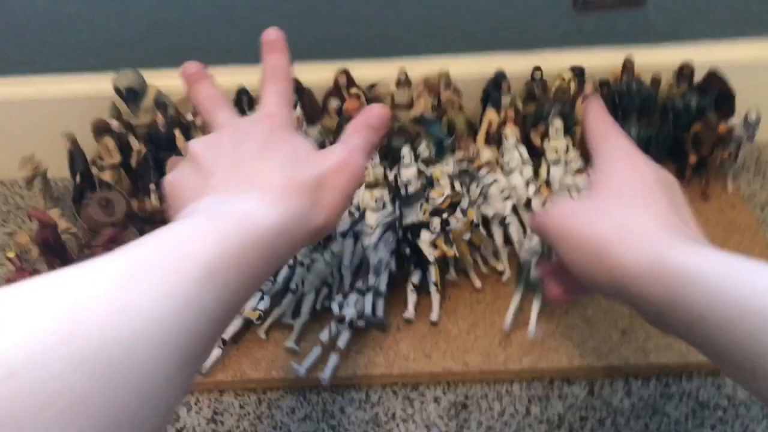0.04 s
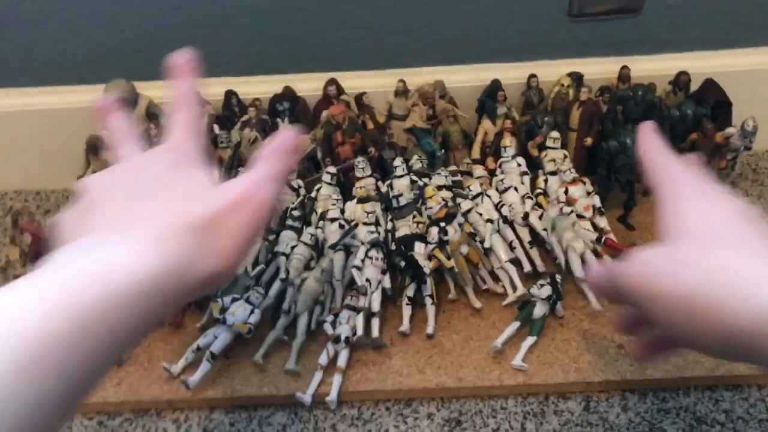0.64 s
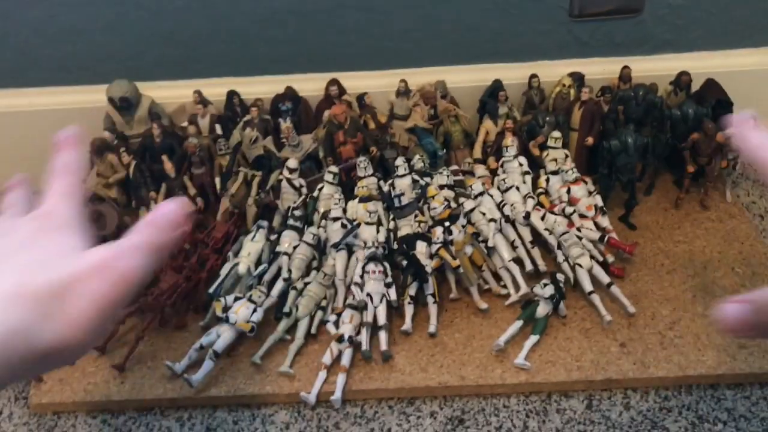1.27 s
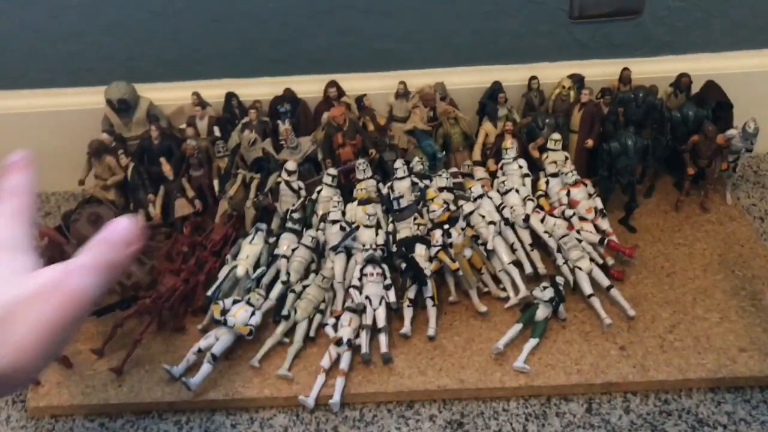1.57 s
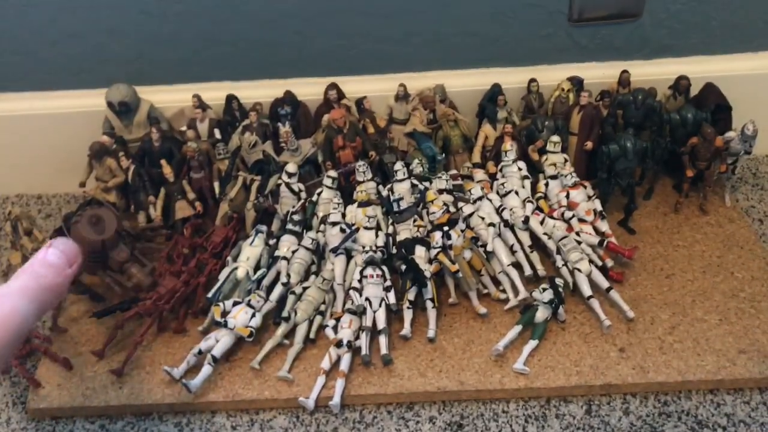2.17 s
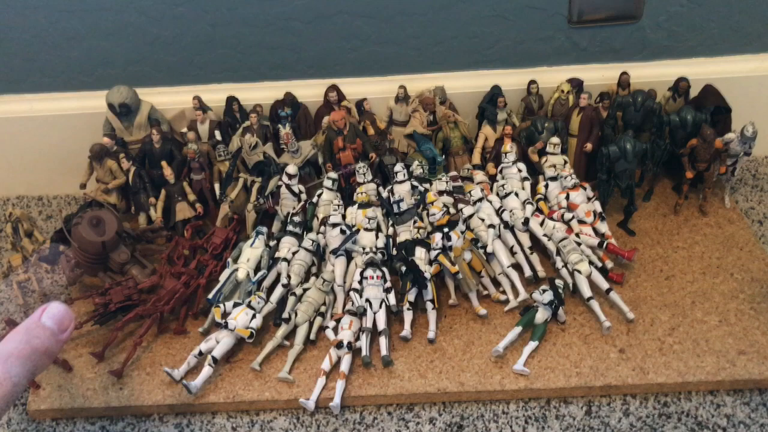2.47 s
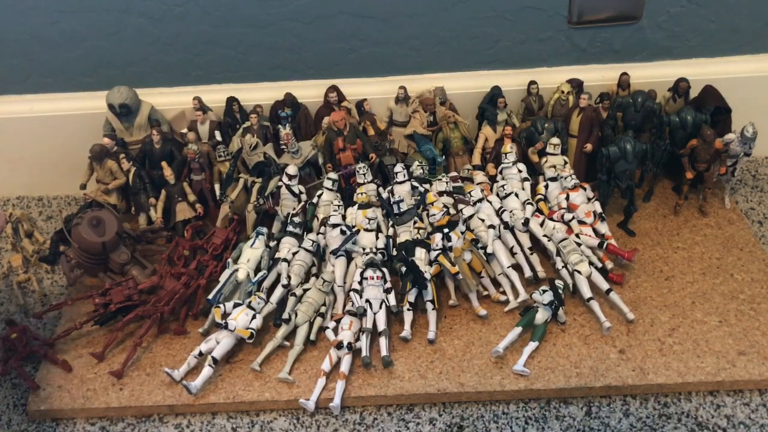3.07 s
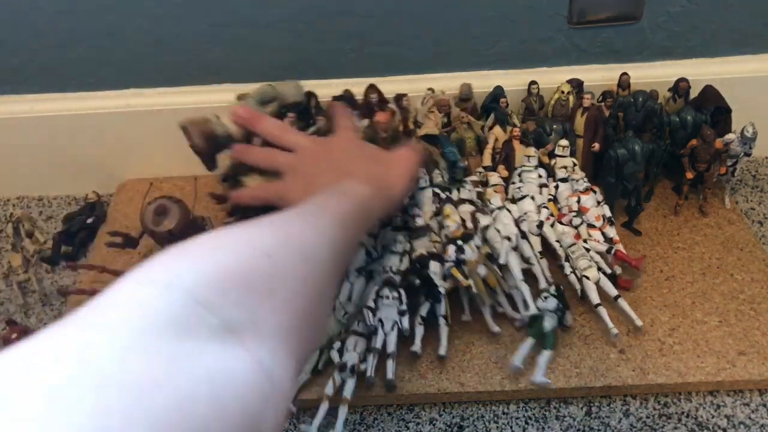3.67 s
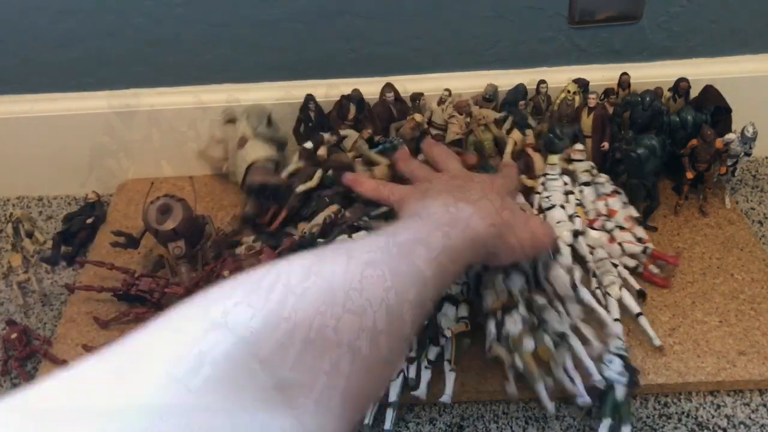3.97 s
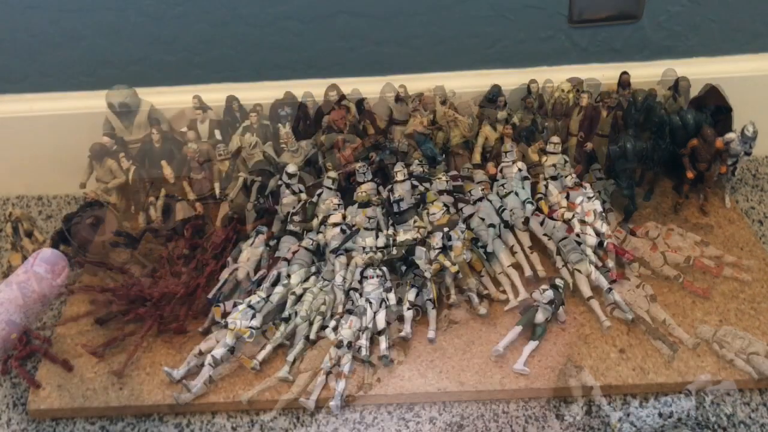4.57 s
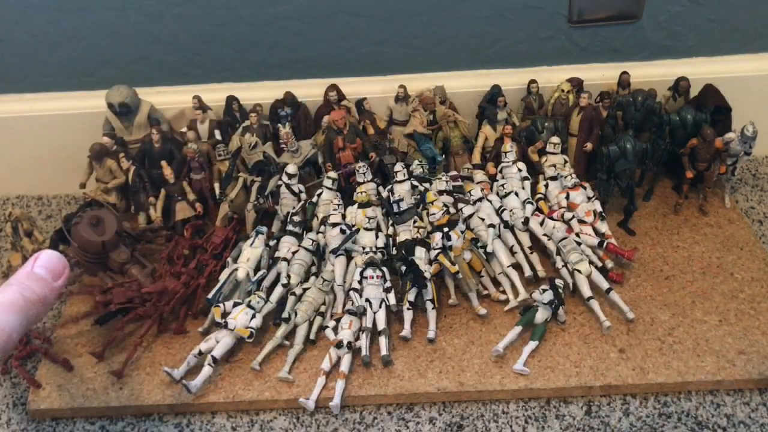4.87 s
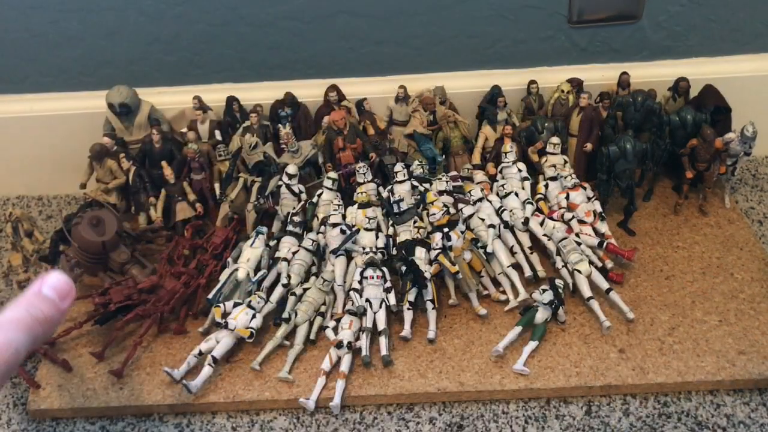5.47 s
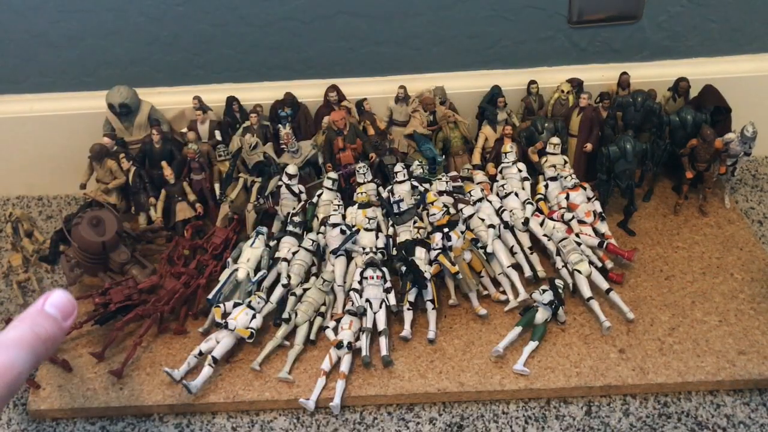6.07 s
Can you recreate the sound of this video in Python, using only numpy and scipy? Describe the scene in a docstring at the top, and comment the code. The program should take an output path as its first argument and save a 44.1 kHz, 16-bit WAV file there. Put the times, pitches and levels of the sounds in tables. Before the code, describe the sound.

Deep, slowed tumbling of plastic toys, a lull, then a rush of clicks and thuds on a board, ending in two soft knocks.

```python
"""A quiet room, where small plastic figures topple into one another on a cork board.
Each impact radiates a click and excites damped modes of limbs, hollow torsos and board; many impacts
merge into clatter. The end of a fall is heard in slow motion, which lowers its clicks to deep knocks.
At normal speed a hand sweeps the crowd over in one rush; then, slower still, a last figure settles
with two soft knocks. A short reverberation follows the impacts, over a low rumble and a faint hiss."""
import sys
import numpy as np
from scipy import signal
from scipy.fft import rfft, irfft
from scipy.io import wavfile
from scipy.ndimage import map_coordinates

SR = 44100
rng = np.random.default_rng(int(sys.argv[2]) if len(sys.argv) > 2 else 0)


def file_out(sig):
    """Save sig as 16-bit WAV at sys.argv[1]."""
    # one column per channel
    cols = np.atleast_2d(sig).T
    # limit, then scale
    lim = np.clip(cols, -1, 1)
    pcm = np.round(lim * 32767).astype(np.int16)
    wavfile.write(sys.argv[1], SR, pcm)


N = 278712

# Stages of motion: start t/s, speed/(normal speed).
# All tables give t as the listener hears it; frequencies and decay rates hold at normal speed.
SPEED_STAGES = [(0, .294), (2.15, 1), (4.8, .196)]
STAGE_STARTS, STAGE_SPEEDS = np.transpose(SPEED_STAGES)
HEARD_TIME = np.arange(N) / SR
SPEED = STAGE_SPEEDS[np.searchsorted(STAGE_STARTS, HEARD_TIME, side="right") - 1]
BOARD_TIME = np.cumsum(SPEED) / SR  # seconds elapsed on the board at each sample heard
BOARD_SAMPLES = int(BOARD_TIME[-1] * SR) + SR // 10
AGE = np.arange(int(.09 * SR)) / SR  # seconds since an impact
TOP_HZ = 15800


def knocks(graze_db=-12, edge_trim_db=-2.5, board_trim_db=-1.5):
    """Impact in stages: an edge grazes, the full blow lands, then torso and board respond."""
    # Prominent collisions: t/s, click level/dB, click f/Hz,
    # then edge, torso and board level/dB relative to the click, before the trims
    collisions = [(0.008, -32, 3320, 1, 10.5, 10.5), (0.034, -48, 2700, 3.5, 2, 15.5),
                  (0.091, -42.5, 2750, -7.5, 7, 16.5), (0.109, -41.5, 2670, -24, 1.5, 9),
                  (0.162, -29, 3420, -24.5, -17, -16), (0.173, -34, 3370, -24.5, -19.5, -9),
                  (0.214, -34.5, 2860, -21, 7.5, 1.5), (0.256, -44.5, 3050, -11.5, -0.5, 8.5),
                  (0.37, -51.5, 3510, -5.5, -2, 1), (0.434, -26.5, 3400, -12.5, 6, -30.5),
                  (0.439, -30.5, 3270, -19, -1.5, 4), (0.533, -47.5, 2580, -23, 10.5, 4),
                  (0.608, -22, 3010, -28.5, -18.5, -29), (0.6766, -59, 2980, 2.5, -3, 6.5),
                  (0.719, -45, 3280, -0.5, -16.5, -7.5), (0.759, -28.5, 4300, -27.5, -9, -0.5),
                  (0.794, -49, 2930, -7.5, -9.5, -11), (0.827, -37.5, 3300, -26, -1, -23),
                  (0.929, -42, 3630, -14.5, -3.5, -20.5), (0.984, -26.5, 3800, -29.5, -20, -41),
                  (1.039, -59.5, 3300, 0, -3, 10), (1.09, -50, 4430, -34, -2.5, -20),
                  (1.117, -37, 3440, -54, -26, -19), (1.329, -63.5, 3150, 1, 5, -10),
                  (2.282, -52, 3690, -23.5, -7, -21), (2.297, -46.5, 3260, -22, -13, -21),
                  (3.098, -62, 3300, -2, 9, 15), (3.393, -54, 4720, 6.5, 0, 14),
                  (3.416, -44, 4770, 7, -17.5, 10.5), (3.432, -35.5, 3550, -3, -1, 4.5),
                  (3.518, -42, 2970, -8, 5.5, 16.5), (3.581, -44.5, 3270, -5.5, 8, -0.5),
                  (3.613, -41.5, 3200, -10.5, 3, 20.5), (3.704, -31.5, 3300, -10, -5, -21),
                  (3.72, -39, 3900, -16.5, -6.5, 9), (3.881, -34, 3400, -11, -8, 8),
                  (3.904, -35, 3130, -16, -11, -27), (3.943, -34, 3460, -3.5, 4, 15),
                  (3.967, -50, 3320, -11, 16.5, 9.5), (4.024, -39.5, 3700, -4, -25, 9.5),
                  (4.046, -38, 3220, -11.5, 4, 13.5), (4.111, -43.5, 2730, -6, 9, 4),
                  (4.146, -42.5, 3440, -19, -5, -26), (4.243, -36.5, 4500, -5.5, -9, -6.5),
                  (4.271, -38, 3550, -11, -48, 2), (4.293, -41.5, 4570, -10, 4, -20),
                  (4.336, -44.5, 2960, -1.5, 8, 19.5), (4.38, -30.5, 3200, -12, -9.5, -19),
                  (4.468, -49, 2920, -16, 11.5, 7), (4.478, -43.5, 4350, -35, -25, 8),
                  (4.521, -50.5, 3260, -11, -4, 2), (4.582, -55.5, 3200, -8, 3.5, -8),
                  (4.722, -67.5, 3240, -0.5, 11, 16), (4.772, -60, 2840, -13, 1, 2.5),
                  (4.993, -45, 3020, -45, -5.5, -5), (5.079, -38.5, 3020, -25.5, -11, -22)]
    out = np.zeros(BOARD_SAMPLES)
    for s, db, hz, edge_db, torso_db, board_db in collisions:
        ring_db = 8.5 + .25 * edge_db  # the harder the edges meet, the more the limbs ring
        graze = undb(graze_db) * click(hz, ring_db) + undb(edge_db + edge_trim_db) * edge_tick()
        blow = click(hz, ring_db)
        response = undb(torso_db) * torso_knock() + undb(board_db + board_trim_db) * board_thump()
        add_impact(out, s, undb(db) * (graze + delay(blow, .0007) + delay(response, .001)))
    return out


def click(hz, ring_db, detune=.022, board_echo_s=.0015, wall_echo_s=.0028):
    """A contact pulse radiates, reflects off board and wall, rings the limbs and scatters off the crowd."""
    # Modes of stiff limbs and helmets: f/Hz, level/dB
    limb_modes = [(1950, 1), (2350, -2), (2600, -12.5), (2900, -5), (3700, -4), (3900, -7), (4650, -1),
                  (5000, -6), (5400, -3.5), (6200, -2), (7200, -12.5)]
    cycles = AGE * hz
    contact = unit(cycles ** 3 * np.exp(-cycles / .3) * np.sin(2 * np.pi * cycles))
    early = contact + undb(-8) * delay(contact, board_echo_s) + undb(-12) * delay(contact, wall_echo_s)
    # the force on the limbs starts more abruptly, so its spectrum is wider
    force = unit(cycles * np.exp(-cycles / .45) * np.sin(2 * np.pi * cycles))
    scatter = unit(noise_burst(t60=.026))
    limbs = modal_ring(limb_modes, t60=.021, detune=detune)
    ringing = signal.fftconvolve(force, limbs + scatter)[:len(AGE)]
    return unit(early + undb(ring_db) * unit(delay(ringing, board_echo_s / 2)))


def edge_tick(rise_s=.0004):
    """Hard edges make brief contact, so their snap lies high in the spectrum."""
    snap = noise_burst(t60=.012) * (1 - np.exp(-AGE / rise_s))
    return unit(band(snap, 6000, 15500))


def torso_knock(t60=.02, rattle_db=-3):
    """A hollow torso resonates, quickly damped by the soft plastic, while its loose joints rattle."""
    # Modes of a torso striking the board: f/Hz, level/dB
    torso_modes = [(540, -2), (690, -1.5), (840, 0.5), (985, 5.5), (1130, -8), (1450, -6.5), (1660, -4)]
    rattle = unit(band(noise_burst(t60), 320, 2200))
    hollow = modal_ring(torso_modes, t60, detune=.036)
    return unit(band(hollow + undb(rattle_db) * rattle, 480, 2100, order=3))


def board_thump():
    """The board yields under a falling figure and vibrates in low modes that the cork damps."""
    # Modes of the board: f/Hz, level/dB
    board_modes = [(88, -8), (120, -4.5), (175, -4), (235, 2.5), (295, 0.5), (375, -2)]
    return unit(band(modal_ring(board_modes, t60=.045, detune=.066), 78, 600))


def clatter(centre_hz=3200, pitch_spread=.34, count=16):
    """Dozens of figures jostle; their impacts add incoherently into a rush."""
    surge_db = flurries()
    # heavy landings come first and light jostling lasts, so the clicks sag the slowest
    click_db = toppling() + surge_db
    body_db = toppling(sag_ratio=1.8) + surge_db
    board_db = toppling(sag_ratio=3.13, on_board=True) + surge_db
    pitches = centre_hz * np.exp(pitch_spread * np.linspace(-2, 2, count))  # small parts click higher
    clicks = [click(hz, ring_db=-1.5, detune=.039) for hz in pitches]
    ticks = [edge_tick() for _ in range(count)]
    return (shower(clicks, click_db - 3, per_s=1000, spread_db=2.5)
            + shower(ticks, body_db - 15, per_s=850, spread_db=3.6)
            + shower([torso_knock() for _ in range(count)], body_db - 1.1, per_s=700, spread_db=2.0)
            + shower([board_thump() for _ in range(count)], board_db - 3.5, per_s=590, spread_db=1.5))


def toppling(sag_ratio=1, on_board=False):
    """Level in dB of the strongest wave of falling figures: abrupt onset, then exponential decay."""
    # Waves: start t/s, end t/s, level/dB, extra level on the board/dB, sag of the clicks/(dB/s)
    waves = [(0.0, 0.18, -39, 10.5, 27.5), (0.439, 0.967, -48.5, 10, 28), (3.402, 4.17, -41.5, 13, 5),
             (3.859, 4.064, -42, 6.5, 5.5), (4.23, 4.386, -44, 5, 5.5)]
    levels = [db + on_board * weight_db
              + envelope_db(start, end, attack_s=.0021, sag_db_per_s=sag_ratio * sag, fall_db_per_s=104.5)
              for start, end, db, weight_db, sag in waves]
    return np.max(levels, axis=0)


def flurries(per_s=55, spread_db=2.1):
    """Random amplitude modulation in dB, as one figure sets off its neighbours."""
    knots = rng.standard_normal(int(BOARD_SAMPLES / SR * per_s) + 2)
    return spread_db * np.interp(np.arange(BOARD_SAMPLES) / SR * per_s, np.arange(len(knots)), knots)


def thuds(rise_s=.0058):
    """The shoving hand and groups landing together drive the board into a heavily damped oscillation."""
    # Heavy blows: t/s, level/dB, f/Hz
    heavy_blows = [(0.018, -24, 115), (0.085, -24, 130.7), (0.498, -29.5, 150), (3.408, -23.5, 121),
                   (3.504, -27.5, 111), (3.574, -22.5, 180), (3.726, -24.5, 120), (3.774, -24.5, 112),
                   (3.829, -27, 99.5), (3.947, -24, 132), (4.336, -29.5, 293.4)]
    out = np.zeros(BOARD_SAMPLES)
    for s, db, hz in heavy_blows:
        rocking = unit(AGE * np.exp(-AGE / rise_s) * np.sin(2 * np.pi * hz * AGE))
        add_impact(out, s, undb(db) * rocking)
    return band(out, 67, 900)


def scrape(band_ratio=1.21, count=4):
    """Stick-slip friction of feet on cork: each slip excites the hollow figure above."""
    # Sliding figures: start t/s, end t/s, level/dB, resonance f/Hz
    slides = [(3.431, 3.508, -38, 578), (3.572, 3.645, -37.5, 930), (4.606, 4.688, -69, 1850)]
    out = 0
    for start, end, db, hz in slides:
        slips = [unit(band(noise_burst(t60=.033), hz / band_ratio, hz * band_ratio)) for _ in range(count)]
        level_db = db + envelope_db(start, end, attack_s=.021, sag_db_per_s=0, fall_db_per_s=235)
        out = out + shower(slips, level_db, per_s=590, spread_db=2.5)
    return out


def reverberation(x, wet_db=-17.5, ceiling_s=.029):
    """Diffuse reflections die quickly in a small carpeted room; the ceiling adds a late return."""
    t = np.arange(SR // 2) / SR
    low, high, patch = rng.standard_normal((3, len(t)))
    tail = band(low, 77, 3700) * decay(t, t60=.36)
    tail += undb(-8) * band(high, 7900, 17000) * decay(t, t60=.32)
    tail = unit(tail * np.minimum(t / .0073, 1))
    ceiling = unit(band(patch, 300, 6600) * (t > ceiling_s) * decay(np.abs(t - ceiling_s), t60=.032))
    return undb(wet_db) * signal.fftconvolve(x, tail + undb(-5) * ceiling)[:BOARD_SAMPLES]


def room_noise():
    """Broadband rumble of the house and faint hiss, the spectrum scaled in frequency by each speed."""
    # Background spectrum: f/Hz, spectral density level/dB
    spectrum = [(15, -112), (30, -96), (50, -81.5), (90, -71), (140, -81.5), (220, -88), (420, -99),
                (650, -98.5), (950, -103), (1800, -109), (3500, -113), (7000, -117), (15000, -120)]
    # Crossfades of the background from one speed to the next: start t/s, end t/s
    crossfades = [(2.149, 2.844), (4.05, 4.94)]
    # Gain of the background in each stage: level/dB
    stage_db = [-1, 4.5, .5]
    hz, db = np.transpose(spectrum)
    arrived = [1] + [np.interp(HEARD_TIME, span, [0, 1]) for span in crossfades] + [0]
    out = 0
    for k, speed in enumerate(STAGE_SPEEDS):
        room_hz = np.maximum(np.fft.rfftfreq(N, 1 / SR), 1) / speed
        colour = undb(np.interp(np.log(room_hz), np.log(hz), db)) * (room_hz < TOP_HZ)
        noise = irfft(rfft(rng.standard_normal(N)) * colour, N) * np.sqrt(SR / 2 / speed)
        out = out + noise * undb(stage_db[k]) * (arrived[k] - arrived[k + 1])
    return out


def modal_ring(modes, t60, detune, uneven_db=3):
    """Free vibration is a sum of damped modes; striking point and tuning vary from blow to blow."""
    hz, db = np.transpose(modes)[:, :, None]
    tuning, strength, polarity = rng.standard_normal((3, len(modes), 1))
    amplitudes = np.sign(polarity) * undb(db + uneven_db * strength)
    partials = amplitudes * np.sin(2 * np.pi * hz * (1 + detune * tuning) * AGE)
    return unit(np.sum(partials, axis=0) * decay(AGE, t60))


def shower(sounds, level_db, per_s, spread_db):
    """Shot noise: a Poisson stream of unequal blows, shared among the given sounds."""
    out = 0
    chance = per_s / SR / len(sounds)
    for sound in sounds:
        size = undb(spread_db * np.minimum(rng.exponential(size=BOARD_SAMPLES), 3))
        stream_rms = np.sqrt(np.mean(size ** 2) * per_s / SR)
        blows = (rng.random(BOARD_SAMPLES) < chance) * size / stream_rms
        out = out + signal.fftconvolve(blows * undb(level_db), sound)[:BOARD_SAMPLES]
    return out


def envelope_db(start_s, end_s, attack_s, sag_db_per_s, fall_db_per_s):
    """Linear attack, then exponential sag and final fall, running in board time."""
    t = np.arange(BOARD_SAMPLES) / SR
    age = t - board_time(start_s)
    after_end = np.maximum(t - board_time(end_s), 0)
    rise = np.clip(age / attack_s, 1e-6, 1)
    return 20 * np.log10(rise) - sag_db_per_s * np.maximum(age - after_end, 0) - fall_db_per_s * after_end


def slow_motion(x, oversample=4):
    """Time scaling: slowing lowers every frequency and lengthens every decay by the same factor."""
    fine = signal.resample_poly(band_limit(x), oversample, 1, window=("kaiser", 10))
    return map_coordinates(fine, [BOARD_TIME * SR * oversample], order=3)


def board_time(s):
    """The moment on the board that is heard at s: the integral of the speed."""
    return np.interp(s, HEARD_TIME, BOARD_TIME)


def add_impact(track, s, hit, reference_s=.005):
    """Superpose a hit to be heard at s; unit energy becomes unit power over reference_s."""
    start = int(board_time(s) * SR)
    track[start:start + len(hit)] += hit[:BOARD_SAMPLES - start] * np.sqrt(reference_s * SR)


def noise_burst(t60):
    """Exponentially damped white noise."""
    return rng.standard_normal(len(AGE)) * decay(AGE, t60)


def decay(t, t60):
    """Exponential decay by 60 dB in t60 seconds."""
    return np.exp(-np.log(1000) * t / t60)


def delay(x, s):
    """Pure delay by s seconds."""
    return np.pad(x, (int(s * SR), 0))[:len(x)]


def band(x, low_hz, high_hz, order=2):
    """Maximally flat band-pass."""
    return signal.sosfilt(signal.butter(order, [low_hz, high_hz], "band", fs=SR, output="sos"), x)


def band_limit(x):
    """Steep low-pass: the upper edge of the microphone's band."""
    return signal.sosfilt(signal.ellip(12, .1, 90, TOP_HZ, fs=SR, output="sos"), x)


def undb(db):
    """Level to amplitude ratio."""
    return 10 ** (np.asarray(db) / 20)


def unit(x):
    """Normalise to unit energy."""
    return x / np.sqrt(np.sum(x ** 2) + 1e-18)


def scene():
    """Superposition: figures and their reverberation, scaled in time together, over the room noise."""
    figures = knocks() + thuds() + clatter() + scrape()
    return (slow_motion(figures + reverberation(figures)) + room_noise())[None]


def record(dry):
    """One microphone of limited bandwidth."""
    return band_limit(dry)


dry = scene()
out = record(dry)
file_out(out)
```